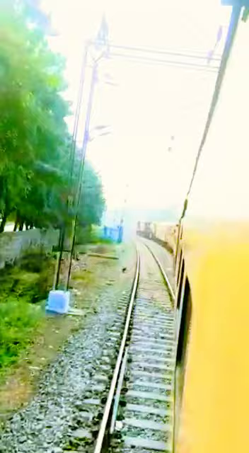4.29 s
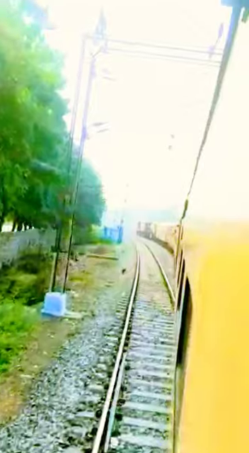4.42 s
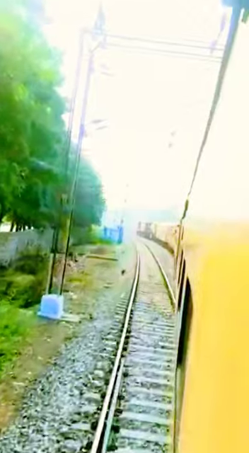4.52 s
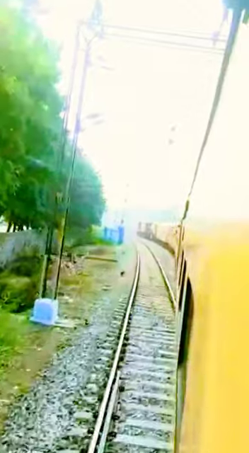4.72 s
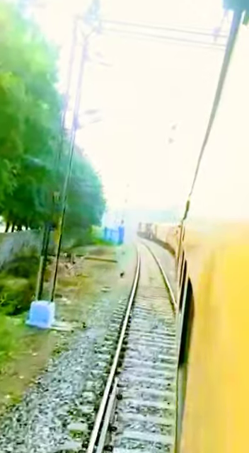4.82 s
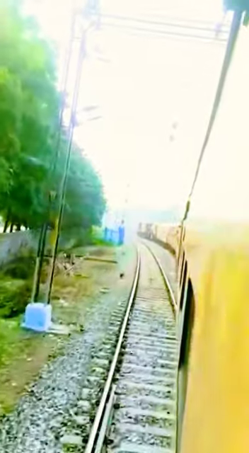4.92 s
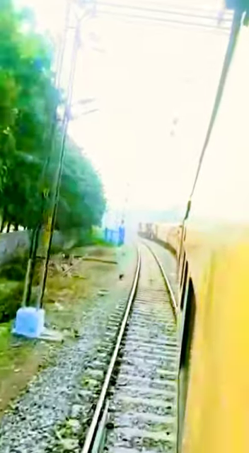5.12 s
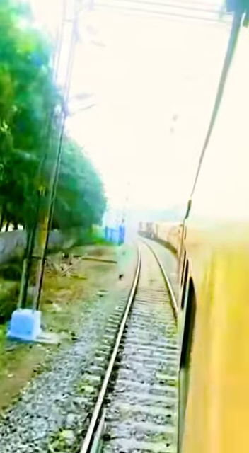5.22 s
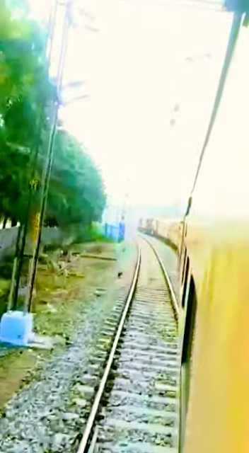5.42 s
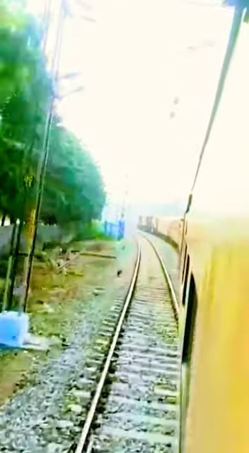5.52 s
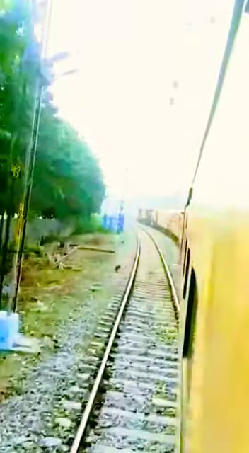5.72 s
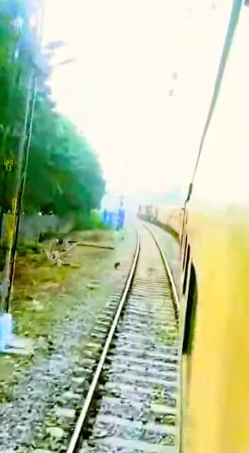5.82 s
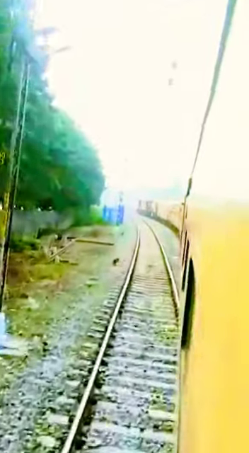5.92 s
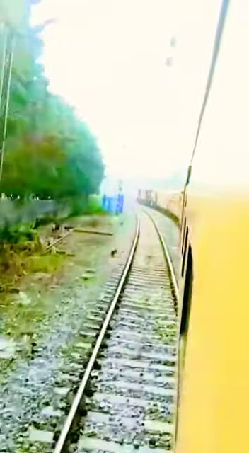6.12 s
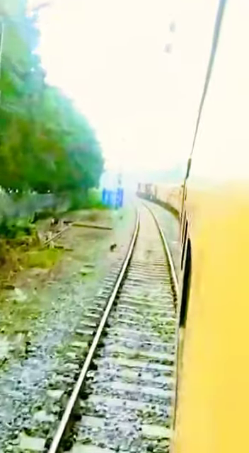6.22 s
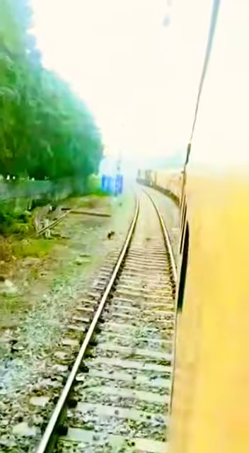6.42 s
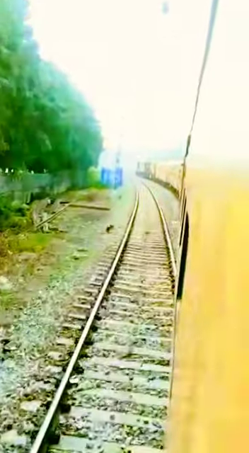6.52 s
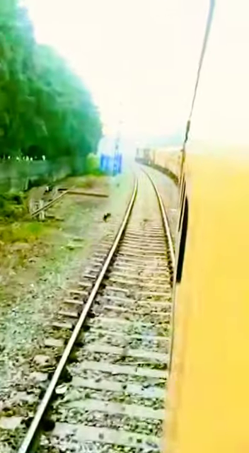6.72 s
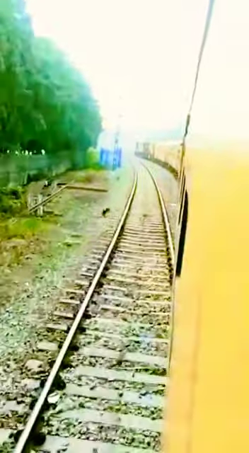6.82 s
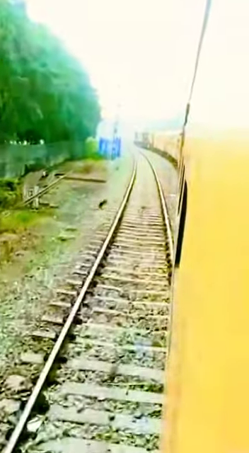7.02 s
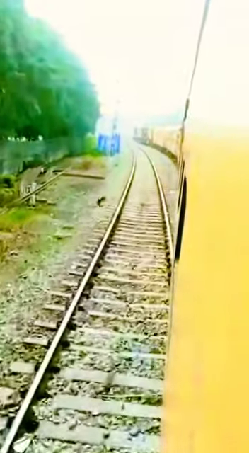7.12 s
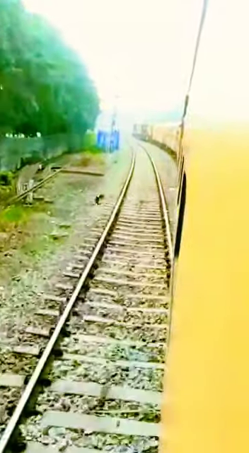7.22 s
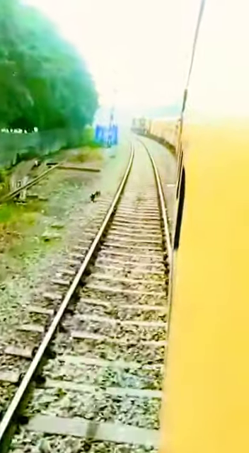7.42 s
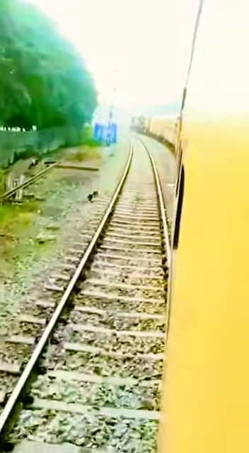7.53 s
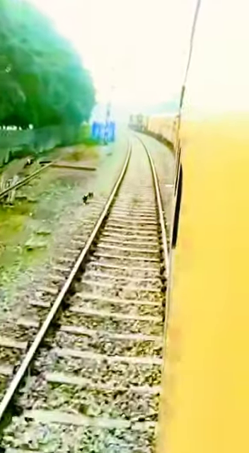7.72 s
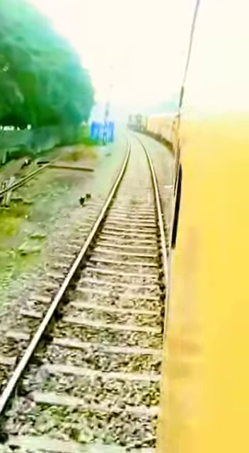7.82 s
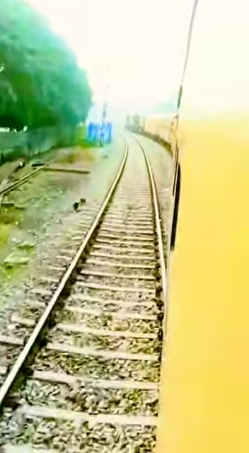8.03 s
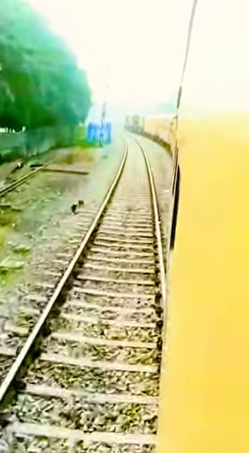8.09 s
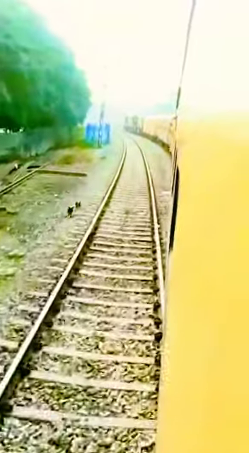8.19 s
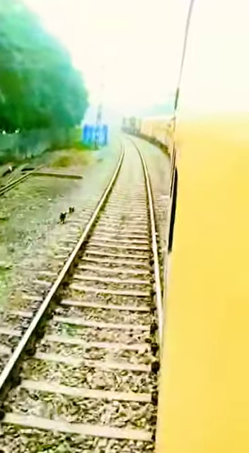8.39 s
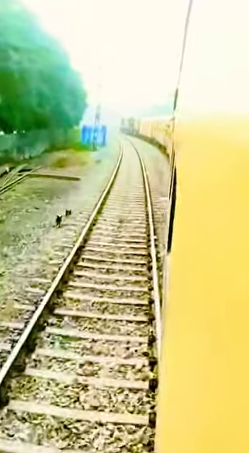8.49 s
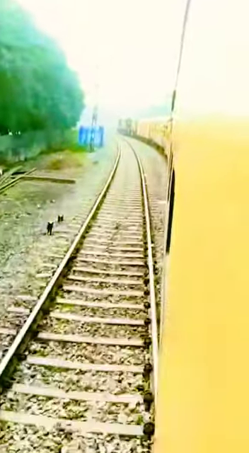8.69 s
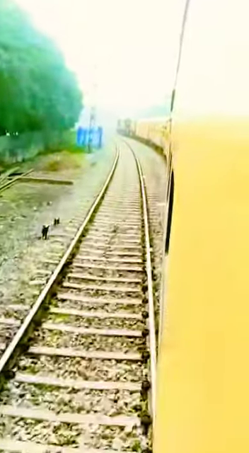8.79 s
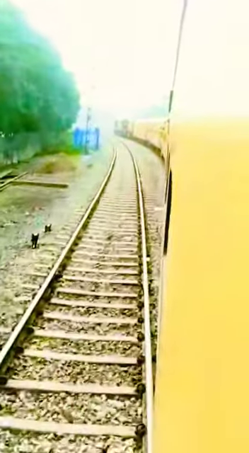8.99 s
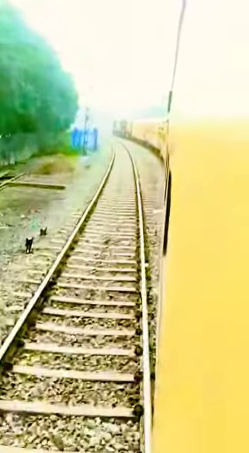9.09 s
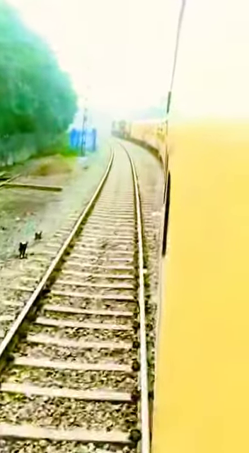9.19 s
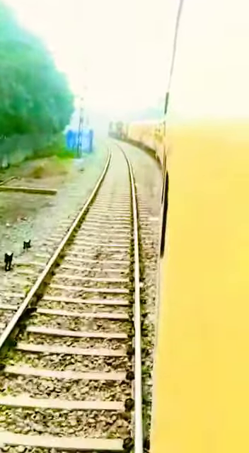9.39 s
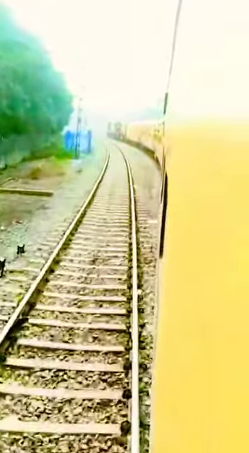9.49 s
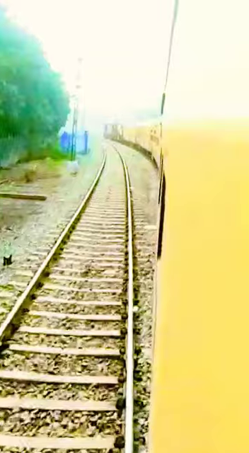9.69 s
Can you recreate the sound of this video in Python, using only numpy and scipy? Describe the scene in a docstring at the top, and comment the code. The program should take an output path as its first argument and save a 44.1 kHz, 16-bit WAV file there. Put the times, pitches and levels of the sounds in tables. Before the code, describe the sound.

A passenger train rolls through a curve, heard close up from an open coach doorway. A low wheel rumble and rail hiss run throughout, along with a thin, high, fluttering whine that keeps swelling briefly.

A rattling jolt with metallic clicks lands at about 0.5 seconds, followed by lighter knocks near 1.3, 1.7 and 2.5 seconds, and soft thumps around 3.8 and 4.6. Another clank comes at 5.6 seconds as the wheels begin to scrape faintly.

From about 6 to 7.8 seconds the rumble grows louder and the ride rougher, with closely packed booms, clanks and steel rattles. A short wheel chirp sounds near 6.4 seconds, heavy thumps just after 7, and a sharp click at 7.8. The whine is strongest in this second half. The jolts then thin out, with knocks around 8.4 and 9 seconds, while the rolling continues to nearly 10 seconds.

```python
"""At the open doorway of a passenger coach, a phone hears the train roll through a curve.
Rail roughness makes the wheels rumble, roar and hiss. Impacts at joints ring the modes of the coach
body and shake loose steel fittings, thickest on a rough stretch; dips in the rail give dull thumps.
A thin, fluttering 2 kHz whine with overtones, probably the inverter's, swells now and then
beside faint, higher switching tones, and at times the slipping flanges chirp and scrape."""
import sys
import numpy as np
from scipy import signal
from scipy.fft import rfft, irfft
from scipy.io import wavfile
from scipy.ndimage import map_coordinates

SR = 44100
rng = np.random.default_rng(int(sys.argv[2]) if len(sys.argv) > 2 else 0)


def output_pcm(signal):
    """Save a mono or channel-first signal as 16-bit PCM at the path in sys.argv[1].

    Samples are clipped to [-1, 1] before scaling.
    """
    pcm = np.clip(np.atleast_2d(signal).T, -1, 1) * 32767
    wavfile.write(sys.argv[1], SR, np.round(pcm).astype(np.int16))


N = 429975
TIME = np.arange(N) / SR
WHINE_HZ = 2017.6

# how far the phone leans out of the doorway: time_s, share
LEAN_OUT = [(5.2, 0), (6.2, 1)]
# band in which the coach body radiates: frequency_hz, gain_db
BODY_RADIATION = [(70, -3), (110, -4), (520, -1.5), (900, -11)]


def undb(db):
    """Decibels to amplitude ratio."""
    return 10 ** (np.asarray(db) / 20)


def unit(x):
    """Normalise to rms 1."""
    return x / np.sqrt(np.mean(x ** 2))


def curves(table):
    """Linear interpolation of each column of a time table."""
    s, *columns = np.transpose(table)
    return [np.interp(TIME, s, c) for c in columns]


def colour(x, points):
    """Spectral shaping through (Hz, dB) points, falling 12 dB an octave beyond them."""
    hz, db = np.transpose(points)
    f = np.maximum(np.fft.rfftfreq(x.shape[-1], 1 / SR), 1)
    octaves_outside = np.maximum(np.log2(hz[0] / f), 0) + np.maximum(np.log2(f / hz[-1]), 0)
    gain_db = np.interp(np.log(f), np.log(hz), db) - 12 * octaves_outside
    return irfft(rfft(x) * undb(gain_db), x.shape[-1])


def wander(rate):
    """Smooth random modulation of rms 1, through rate random values a second."""
    knots = rng.standard_normal(4096)
    return unit(map_coordinates(knots, [TIME * rate], order=2, mode="wrap"))


def swell(middle_s, length_s):
    """A Gaussian rise and fall."""
    return np.exp(-2 * np.minimum(((TIME - middle_s) / length_s) ** 2, 20))


def resonant_noise(hz, width_hz, size=N, order=1):
    """A resonance driven by separate noise at each port; higher orders have steeper flanks."""
    f = np.fft.rfftfreq(size, 1 / SR)
    attenuation = (1 + (2 * (f - hz) / width_hz) ** 2) ** order
    return unit(irfft(rfft(rng.standard_normal((2, size))) / attenuation, size))


def add(track, start_s, sound):
    """Superpose a sound on a track."""
    start = max(int(start_s * SR), 0)
    part = sound[..., :max(N - start, 0)]
    track[..., start:start + part.shape[-1]] += part


def at_ports(x, lag_s=0.00031):
    """Path difference: bass reaches the right microphone port just after the left."""
    return np.array([x, np.interp(TIME - lag_s, TIME, x)])


def grit(spread_db):
    """Dense micro-impacts of uneven size sum to noise, uncorrelated at the two ports."""
    sizes = np.repeat(rng.standard_normal((2, N // 32 + 1)), 32, axis=1)[:, :N]
    return unit(rng.standard_normal((2, N)) * undb(spread_db * sizes))


def rolling(roar_db=-41.5):
    """Roughness excitation: the body rumbles, wheels roar and rails hiss, throbbing with the load."""
    # track roughness, as relative levels: time_s, rumble_db, hiss_db
    roughness = [(0.0, -32, -45.5), (3.09, -32.5, -45), (4.86, -33, -46.5), (6.11, -30.5, -43),
                 (6.54, -27, -40.5), (7.47, -28.5, -45), (7.93, -33.5, -44.5), (8.33, -28, -44),
                 (9.75, -33.5, -46)]
    # body rumble and wheel roar: frequency_hz, density_db
    rumble_spectrum = [(25, -32), (36, -9.5), (55, -3.5), (80, -3.5), (120, -1.5), (170, -0.5), (240, -3),
                       (285, 3), (340, -4.5), (450, -4.5), (580, -15.5), (750, -39)]
    diffuse_spectrum = [(30, -15), (60, -12.5), (200, 0.5), (400, -6.0), (600, -17), (800, -23.5)]
    roar_spectrum = [(350, -61), (600, 0), (645, 0), (1080, -1), (1210, -3.5), (1420, -8), (1900, -3.5),
                     (2470, -12), (4180, -120)]
    # rail hiss, with the treble cut off above 12 kHz: frequency_hz, density_db
    hiss_spectrum = [(1500, -1.5), (1850, 1), (2300, 3), (2800, 1.5), (3700, 3.5), (4500, -1.5), (5800, -2),
                     (7200, -5), (8500, -4.5), (10000, -5.5), (12000, -5.5), (12250, -32)]
    rumble_db, hiss_db = curves(roughness)
    load = wander(14)
    diffuse = unit(colour(rng.standard_normal((2, N)), diffuse_spectrum))
    direct = unit(colour(rng.standard_normal(N), rumble_spectrum))
    rumble = at_ports(direct) + undb(-9) * diffuse
    roar = unit(colour(grit(spread_db=0.5), roar_spectrum))
    hiss = unit(colour(grit(spread_db=1.5), hiss_spectrum))
    return (rumble * undb(rumble_db + 0.63 + 0.82 * load)
            + roar * undb(roar_db + 1.2 * load)
            + hiss * undb(hiss_db + 2.5 + 0.6 * load + 0.71 * wander(30)))


def steady_tone(hz, drift_hz):
    """Slow phase modulation: a sinusoid drifts in pitch and sways in phase at each port."""
    drift = np.cumsum(drift_hz * wander(4)) / SR
    sway = np.array([wander(3), wander(3.3)]) / (2 * np.pi)
    return np.sqrt(2) * np.sin(2 * np.pi * (hz * TIME + drift + sway))


def even_out(x):
    """Envelope compression: the pitch keeps jittering while the level swings less."""
    envelope = np.abs(signal.hilbert(unit(x)))
    return unit(x / np.sqrt(envelope + 0.5))


def whine(jitter_db=-40, pan_db=5, lean_db=-1.5, jitter_hz=36, surge_db=0.4, surges_per_s=8.1):
    """Beating: a swelling tone, probably the inverter's, flutters against a narrow band of noise."""
    # slow course of the pure tone: time_s, level_db
    tone_levels = [(0, -61), (1.9, -44), (4.2, -46), (5.4, -52), (6.8, -42), (7.9, -44), (9.75, -49)]
    # moments when it sings out: middle_s, length_s, level_db
    swells = [(0.97, 0.062, -36), (1.356, 0.13, -38), (1.714, 0.035, -34.5), (1.963, 0.094, -36),
              (2.46, 0.12, -37), (3.02, 0.12, -37), (3.302, 0.14, -47), (3.57, 0.079, -38),
              (3.746, 0.081, -36), (4.121, 0.022, -36), (5.23, 0.032, -35), (5.7, 0.1, -38),
              (6.058, .06, -37.5), (6.5, 0.03, -34), (6.653, 0.1, -32.5), (7.12, 0.063, -34),
              (7.262, 0.063, -33.5), (7.51, 0.069, -37), (8.08, 0.071, -31.5), (8.717, 0.069, -35),
              (9.152, .05, -35), (9.54, 0.03, -32.5)]
    # narrow band filled by the jitter: frequency_hz, density_db
    jitter_spectrum = [(1945, -15), (1978, 1), (2000, 6), (2018, 8), (2030, 10.5), (2048, 6), (2062, 3),
                       (2074, -15), (2100, -35)]
    # harmonics from the second up: steady_db, jittering_db, left_minus_right_db
    overtones = [(-56.5, -51.5, -5.5), (-59.5, -56, -2.5), (-64, -57.5, -0.5)]
    lean, = curves(LEAN_OUT)
    tone_db, = curves(tone_levels)
    sides = np.array([[1], [-1]]) / 2
    surging = undb(tone_db + surge_db * np.minimum(wander(surges_per_s), 1.6))
    singing = sum(undb(db) * swell(s, length_s) for s, length_s, db in swells)
    jitter = undb(jitter_db) * even_out(colour(rng.standard_normal((2, N)), jitter_spectrum))
    core = np.hypot(surging, singing) * steady_tone(WHINE_HZ, drift_hz=2.487)
    out = (core + jitter) * undb(pan_db * sides)
    for k, (steady_db, jittering_db, side_db) in enumerate(overtones, 2):
        steady = undb(steady_db) * steady_tone(k * WHINE_HZ, drift_hz=4)
        jittering = undb(jittering_db) * resonant_noise(k * (WHINE_HZ + 15), k * jitter_hz)
        # the overtones weaken outside the doorway
        out += (steady + jittering) * undb(lean_db * lean + side_db * sides)
    return out


def whistle(level_db=-66, width_hz=260):
    """The whine's seventh harmonic, a faint narrow band above the hiss."""
    return undb(level_db) * resonant_noise(7 * WHINE_HZ, width_hz, order=2)


def switching():
    """Inverter tones waver slightly as the phone moves through their standing waves."""
    # switching tones: pitch_hz, level_db, lean_change_db
    tones = [(5889, -62, -3), (8834, -65, -2), (9134, -68, 7.5), (9233, -68, -1), (11679, -63.5, -5)]
    lean, = curves(LEAN_OUT)
    return sum(undb(db + change_db * lean + wander(1.76)) * steady_tone(hz, drift_hz=1.38)
               for hz, db, change_db in tones)


def heaves(hz=104, rise_s=0.034, spread=0.176, count=3):
    """Damped oscillation: the coach drops on its springs with a deep thump."""
    # drops of the suspension: start_s, level_db
    drops = [(0.49, -27), (0.902, -33), (1.697, -35), (5.554, -32), (7.151, -19)]
    t = np.arange(SR // 2) / SR
    envelope = t / rise_s * np.exp(1 - t / rise_s)
    out = np.zeros(N)
    for start_s, db in drops:
        pitches = hz * np.exp(spread * rng.uniform(-0.67, 1, (count, 1)))
        ring = unit(np.sin(2 * np.pi * pitches * t).sum(axis=0))
        add(out, start_s, undb(db) * ring * envelope)
    return at_ports(out)


def body_ring(t, upper_db, main_hz, hardness=0.89, focus_db=5, focus_octaves=0.33):
    """Modal impulse response: hard contact favours upper modes, the spot struck those near main_hz."""
    # coach body modes: pitch_hz, level_db, t60_s
    modes = [(98, 6, 0.049), (115.7, 7, 0.11), (159, 5, 0.14), (211.8, 3, 0.18), (276, 6.5, 0.094),
             (336.5, 2, 0.12), (405, -1, 0.12), (522, 0, 0.071), (651, -12, 0.1), (817, -12.5, 0.11)]
    hz, db, t60 = np.transpose(modes)[:, :, None]
    hz = hz * (1 + 0.057 * rng.standard_normal(hz.shape))
    focus = np.exp(-(np.log2(hz / main_hz) / focus_octaves) ** 2)
    tilt_db = hardness * (upper_db + 13) * np.log2(hz / 230)
    gain = undb(db + focus_db * focus + tilt_db)
    # neighbouring modes move the doorway in antiphase, so the boom takes a few cycles to build
    polarity = np.where(np.arange(len(hz)) % 2, -1, 1)[:, None]
    decay = np.exp(-np.log(1000) * t / t60)
    return np.sum(polarity * gain * np.sin(2 * np.pi * hz * t) * decay, axis=0)


def thud(t, length_s, upper_db, main_hz, bounce=0.6, bounce_s=0.008, count=16):
    """Convolution: a blow and its uneven rebounds, dying over length_s, each ring the coach body."""
    gaps, sizes = rng.uniform(0.3, 1.7, count), rng.standard_normal(count)
    delays = np.minimum(bounce_s * np.cumsum(gaps), t[-1])
    blows = np.zeros(len(t))
    blows[(delays * SR).astype(int)] = bounce * sizes * np.exp(-(delays / length_s) ** 2)
    blows[0] = 1
    boom = signal.fftconvolve(blows, body_ring(t, upper_db, main_hz))[:len(t)]
    return undb(-19.5) * unit(boom)


def panel_modes(x, spacing_hz=70, depth_db=3):
    """Steel panels resonate at many irregularly spaced pitches."""
    f = np.fft.rfftfreq(N, 1 / SR)
    peaks = map_coordinates(rng.standard_normal(4096), [f / spacing_hz], order=2, mode="wrap")
    return irfft(rfft(x) * undb(depth_db * np.minimum(peaks, 2)), N)


def chatter(strikes_per_s=120, ring_s=0.036, floor=0.16):
    """Envelope of random strikes whose energies add and decay exponentially."""
    strikes = (rng.random(N) < strikes_per_s / SR) * rng.exponential(size=N)
    energy = signal.lfilter([1], [1, -np.exp(-2 / (ring_s * SR))], strikes)
    return unit(np.sqrt(energy / energy.mean() + floor))


def jolts(hold_share=0.69, rise_s=0.0021, shake_s=0.042, tail_db=-17, tail_s=0.097, side_db=-14):
    """Impact excitation: at joints and points the body booms and loose fittings clank and rattle."""
    # impacts, levels relative: start_s, length_s, boom_db, upper_modes_db, clank_db, rattle_db, main_hz
    impacts = [(0.497, 0.057, -4.5, -11.5, -23, -26.5, 344), (1.27, 0.021, -9, -13, -31, -32.5, 283),
               (1.702, 0.075, -10, -12.5, -26.5, -38.5, 285), (2.438, 0.14, -14.5, -8, -33, -43, 282),
               (3.835, 0.075, -11.5, -4, -31, -45, 333), (5.557, 0.045, -9, -9.5, -31, -41.5, 134),
               (5.787, 0.052, -15.5, -10, -50, -44, 154), (6.321, 0.029, -1.5, -14, -20.5, -36.5, 133),
               (6.411, 0.092, -7, -9.5, -49, -38.5, 240), (6.851, 0.095, -7.5, -9.5, -34, -39, 302),
               (7.004, 0.04, 1, -10, -24.5, -28.5, 227), (7.159, 0.065, -0.5, -18, -33, -34.5, 175),
               (7.322, 0.024, -8.5, -15, -37, -43, 191), (7.407, 0.05, -10.5, -26, -33.5, -39, 162),
               (7.553, 0.038, -5, -14, -26.5, -47, 134), (7.772, 0.018, 0.5, -12.5, -21, -28, 138),
               (8.383, 0.085, -5.5, -20, -33, -39.5, 171), (9.009, 0.024, -5, -10, -25.5, -34.5, 183),
               (9.155, 0.12, -10.5, -11.5, -39.5, -50, 165)]
    # clank of steel fittings: frequency_hz, density_db
    clank_spectrum = [(400, 15.5), (600, 7.5), (850, 4.5), (1300, -0.5), (1850, 6.5), (2400, -1.5),
                      (3500, -11)]
    # steel rattle, with the treble cut off above 12 kHz: frequency_hz, density_db
    rattle_spectrum = [(1500, -2), (2500, 8), (3800, 10), (6000, 4), (8500, 2.5), (12000, 2), (12600, -45)]
    t = np.arange(SR // 2) / SR
    boom, side_boom, clank_power, rattle_power = np.zeros((4, N))
    for start_s, length_s, boom_db, upper_db, clank_db, rattle_db, main_hz in impacts:
        # the fittings shake while the rebounds last, then settle; the vestibule adds a short tail
        settling = np.maximum(t - hold_share * length_s, 0)
        decay = np.exp(-settling / shake_s) + undb(tail_db) * np.exp(-settling / tail_s)
        shake = (1 - np.exp(-t / rise_s)) * decay
        add(boom, start_s + 0.0021, undb(boom_db) * thud(t, length_s, upper_db, main_hz))
        add(side_boom, start_s + 0.0016, undb(boom_db + side_db) * thud(t, length_s, upper_db, main_hz))
        add(clank_power, start_s + 0.0009, (shake * undb(clank_db)) ** 2)
        add(rattle_power, start_s + 0.0021, (shake * undb(rattle_db)) ** 2)
    clank = np.sqrt(clank_power) * unit(colour(panel_modes(grit(spread_db=4)), clank_spectrum))
    rattle = np.sqrt(rattle_power) * unit(colour(grit(spread_db=-0.5), rattle_spectrum)) * chatter()
    # the side walls reach the two ports in antiphase
    walls = np.array([[1], [-1]]) * colour(side_boom, BODY_RADIATION)
    return at_ports(colour(boom, BODY_RADIATION)) + walls + undb(-3) * clank + undb(-0.5) * rattle


def ticks(decay_cycles=24, relative_width=1.57, rise_s=0.0016):
    """Hard contacts decay over a set number of cycles, so high ones snap and low ones clang."""
    # steel-on-steel contacts within hard jolts: start_s, level_db, centre_hz
    contacts = [(.5015, -22, 4600), (.524, -38, 3000), (0.543, -24, 3900), (0.565, -23.5, 3830),
                (.586, -30, 3800), (1.284, -25.5, 4000), (1.308, -24.5, 4450), (2.525, -29.5, 3900),
                (5.5655, -29, 2400), (5.566, -27, 585), (6.326, -20, 6760), (6.897, -31, 3300),
                (7.016, -28, 870), (7.189, -35, 5500), (7.337, -30, 5000), (7.778, -8.5, 9700),
                (9.005, -28, 950), (9.021, -31, 3800)]
    t = np.arange(SR // 4) / SR
    out = np.zeros((2, N))
    for start_s, db, hz in contacts:
        envelope = (1 - np.exp(-t / rise_s)) * np.exp(-t * hz / decay_cycles)
        ring = resonant_noise(hz, relative_width * hz, size=len(t))
        add(out, start_s, undb(db) * np.sqrt(2) * envelope * ring)
    return out


def flange_chirps():
    """Sliding friction: a flange slips on the rail and rasps in one wheel mode."""
    # slips: middle_s, length_s, pitch_hz, width_hz, level_db
    slips = [(1.02, 0.13, 3500, 140, -50.5), (2.215, 0.04, 3530, 60, -48), (4.697, .04, 3470, 60, -46),
             (5.42, 0.04, 3490, 60, -46.5), (6.446, 0.019, 3840, 380, -26),
             (7.535, 0.048, 4460, 5000, -36.5), (7.998, 0.053, 4270, 500, -44),
             (8.448, 0.048, 4000, 3800, -33), (8.83, 0.023, 11000, 900, -45),
             (9.58, 0.085, 7900, 1010, -44.5)]
    return sum(undb(db) * swell(s, length_s) * resonant_noise(hz, width_hz, order=2)
               for s, length_s, hz, width_hz, db in slips)


def thumps(rebounds_s=0.015, upper_db=-14):
    """Soft impact: a wheel drops into a dip and the body booms once, leaving the fittings still."""
    # dips in the rail: start_s, relative_level_db, main_hz
    dips = [(3.131, -15.5, 220), (3.45, -18.5, 218), (3.806, -11.5, 195), (3.885, -22, 171),
            (4.573, -9.5, 267), (6.095, -17.5, 280), (6.119, -7.5, 300), (6.568, -7.5, 308),
            (6.653, -11, 179), (6.735, -7, 149), (6.817, -17, 210), (7.027, -10, 288), (7.143, -6.5, 153),
            (7.231, -11.5, 123), (7.467, -11.5, 113), (7.588, -13, 134), (8.093, -16, 212),
            (8.126, -16, 200), (8.283, -19, 196), (8.382, -7.5, 207), (8.466, -14.5, 170),
            (9.696, -16, 111)]
    t = np.arange(SR // 2) / SR
    boom = np.zeros(N)
    for start_s, db, main_hz in dips:
        add(boom, start_s, undb(db) * thud(t, rebounds_s, upper_db, main_hz))
    return at_ports(colour(boom, BODY_RADIATION))


def flange_scrape():
    """Stick-slip: on the rough stretch the flanges drive each wheel mode in bursts of its own."""
    # strength of the scraping: time_s, level_db
    scrape = [(5.3, -74), (5.65, -43), (6.25, -49.5), (6.65, -41), (7.2, -46), (7.55, -40.5), (7.75, -57),
              (9.75, -53)]
    # wheel modes: pitch_hz, width_hz, relative_level_db
    wheel_modes = [(1810, 390, -15), (3000, 1400, -4), (3670, 810, -1), (4600, 1100, -2), (6250, 3600, 1.5),
                   (8300, 3900, 2.5)]
    scrape_db, = curves(scrape)
    wheel = np.zeros((2, N))
    for hz, width_hz, db in wheel_modes:
        ring = resonant_noise(hz, width_hz, order=2)
        wheel += undb(db) * ring * chatter(strikes_per_s=33, ring_s=0.014, floor=0.63)
    return undb(scrape_db) * unit(wheel)


def scene():
    """Superposition of all the sources at the doorway."""
    return (rolling() + jolts() + thumps() + heaves() + ticks()
            + flange_scrape() + flange_chirps() + whine() + whistle() + switching())


def record(dry, drive_db=0.23, top_hz=15000):
    """Transduction: the phone dulls the right channel, rounds hard peaks and cuts the top steeply."""
    # response of the right microphone: frequency_hz, gain_db
    right_response = [(100, -1), (170, -0.5), (300, -4.5), (480, -1.5), (700, 0.5), (1200, -2.5),
                      (2300, -1), (4400, -2.5), (7000, -4), (8700, -6), (10500, -14.5), (12000, -24)]
    hz, db = np.transpose(right_response)
    right_gain = undb(np.interp(np.fft.rfftfreq(N, 1 / SR), hz, db))
    right = irfft(rfft(dry[1]) * right_gain, N)
    rounded = np.tanh(undb(drive_db) * np.array([dry[0], right]))
    return signal.sosfilt(signal.ellip(10, 0.2, 70, top_hz, fs=SR, output="sos"), rounded)


dry = scene()
out = record(dry)
output_pcm(out)
```